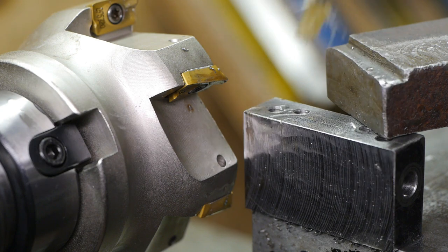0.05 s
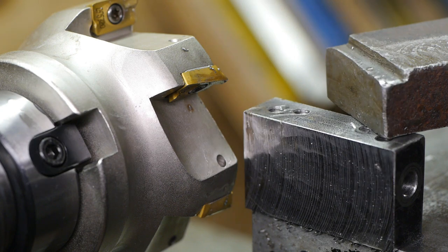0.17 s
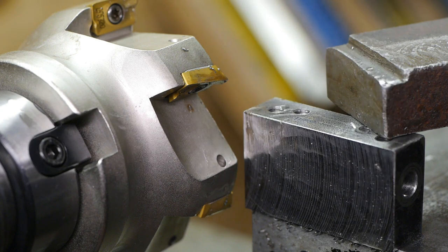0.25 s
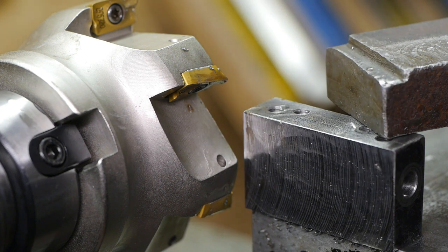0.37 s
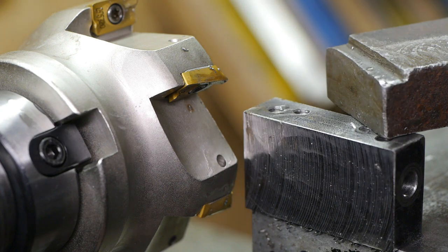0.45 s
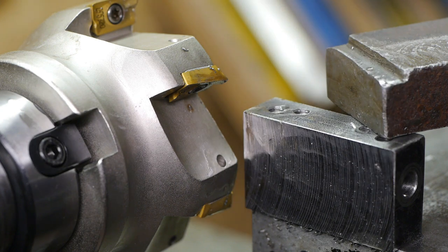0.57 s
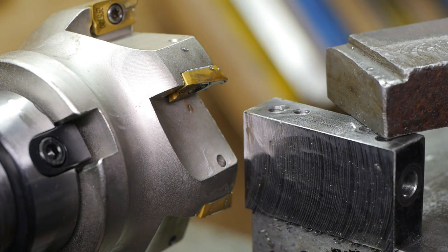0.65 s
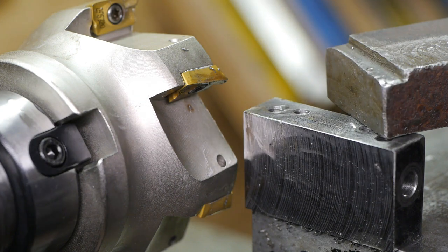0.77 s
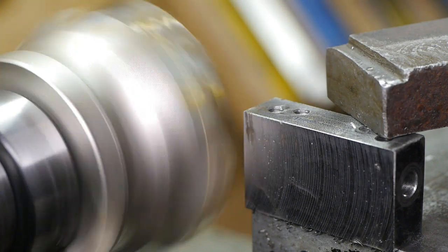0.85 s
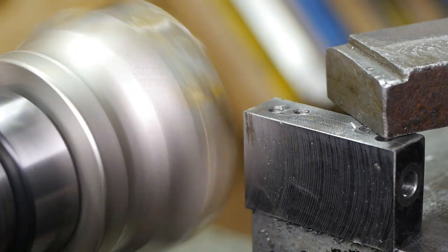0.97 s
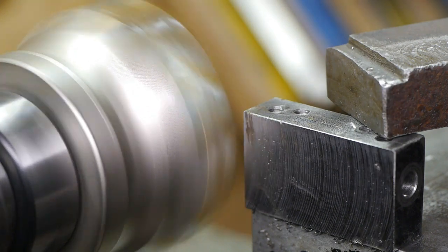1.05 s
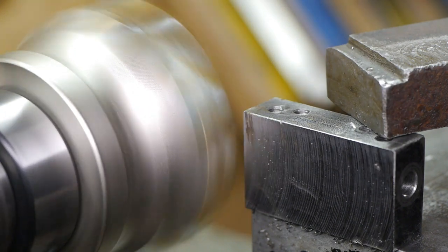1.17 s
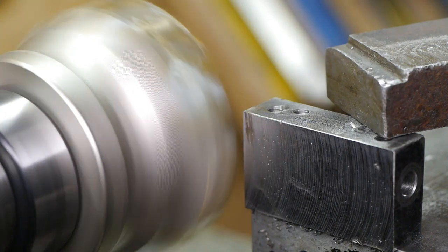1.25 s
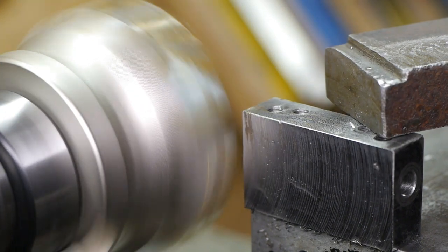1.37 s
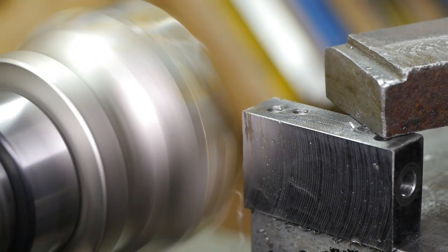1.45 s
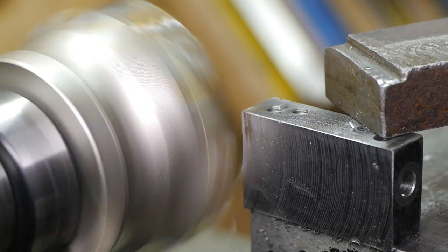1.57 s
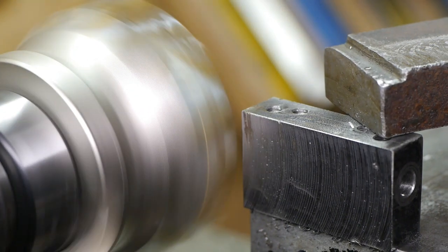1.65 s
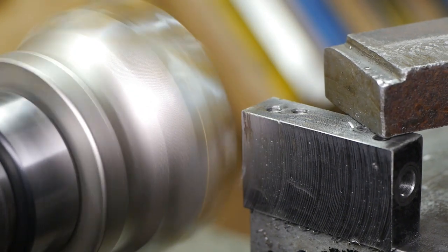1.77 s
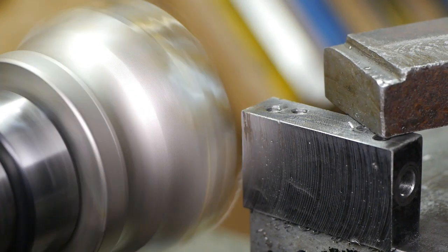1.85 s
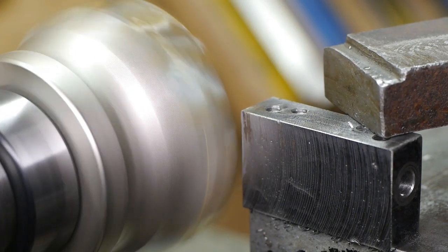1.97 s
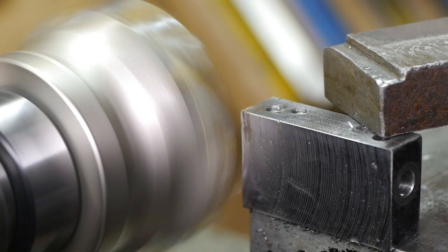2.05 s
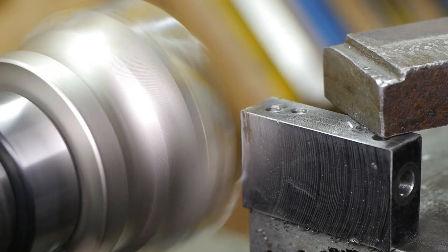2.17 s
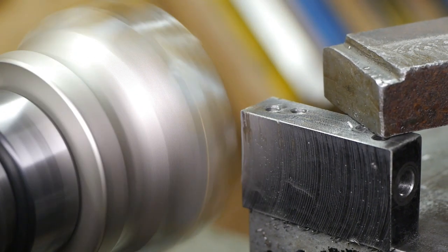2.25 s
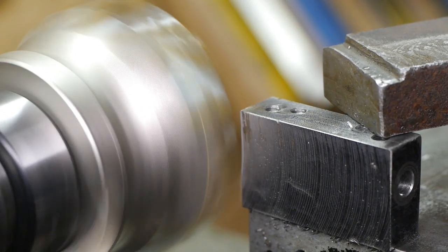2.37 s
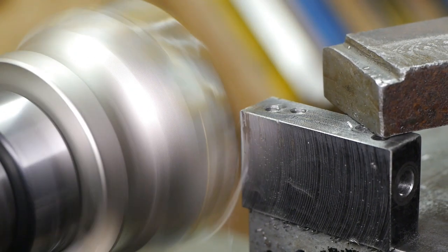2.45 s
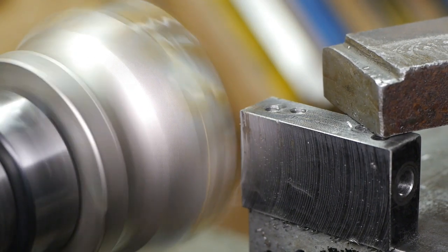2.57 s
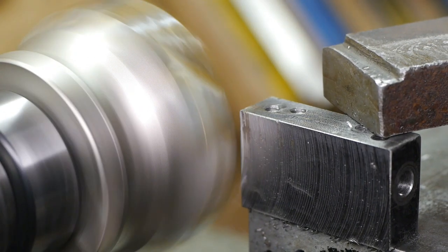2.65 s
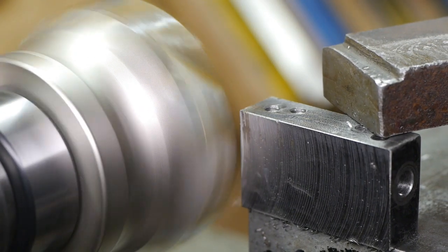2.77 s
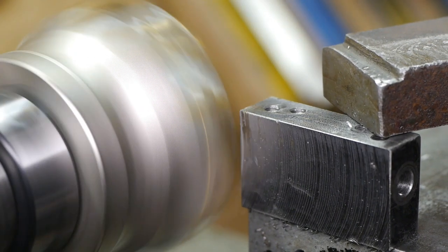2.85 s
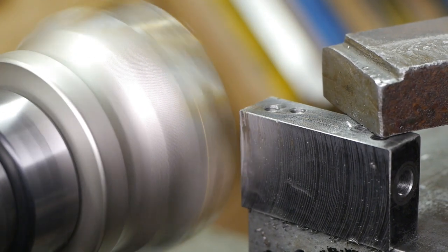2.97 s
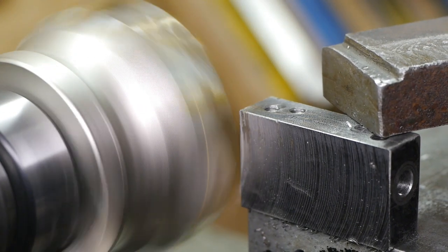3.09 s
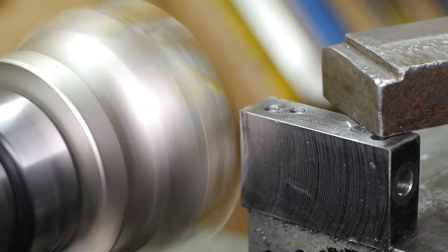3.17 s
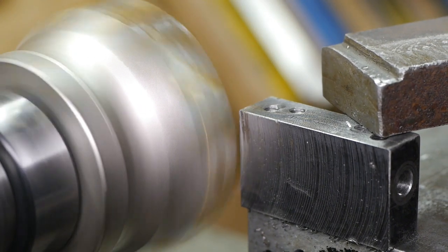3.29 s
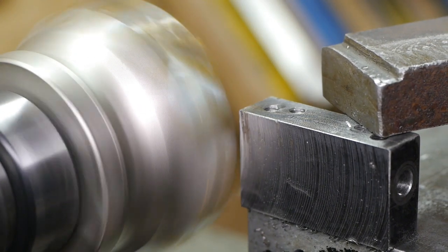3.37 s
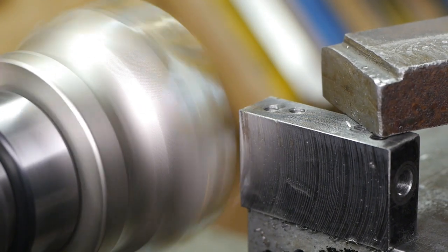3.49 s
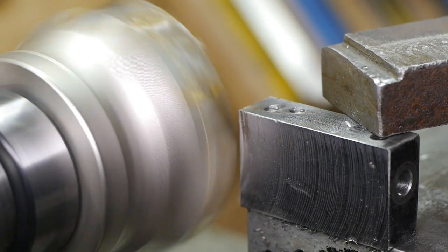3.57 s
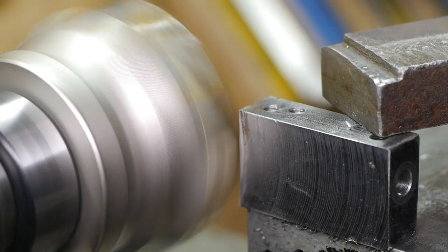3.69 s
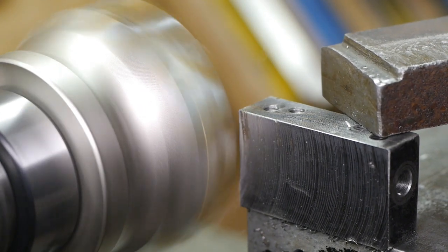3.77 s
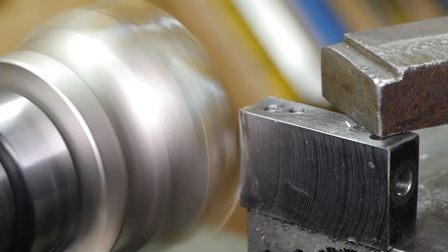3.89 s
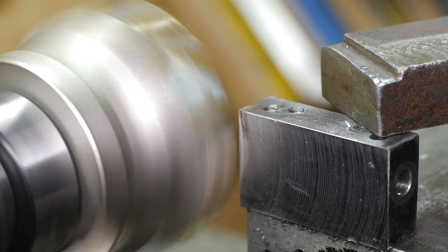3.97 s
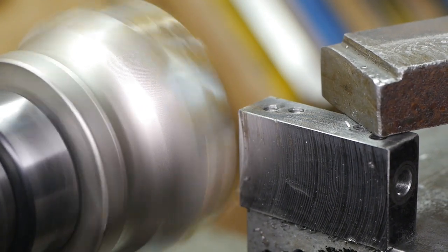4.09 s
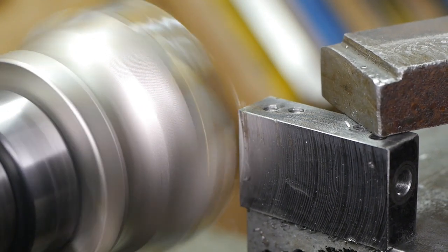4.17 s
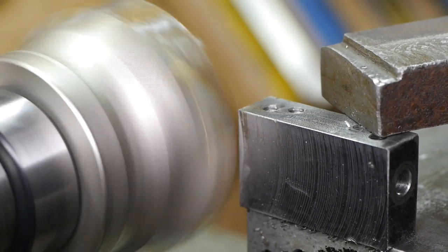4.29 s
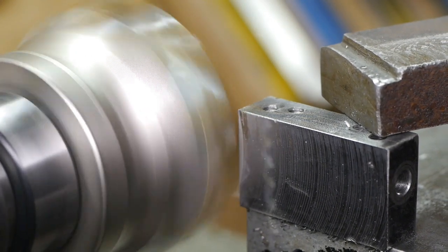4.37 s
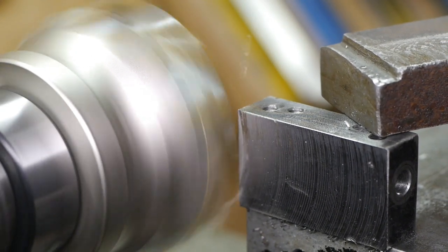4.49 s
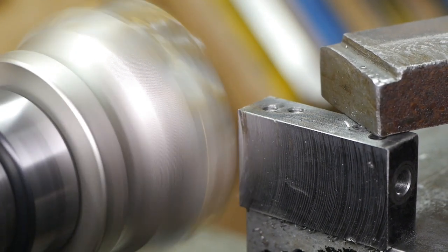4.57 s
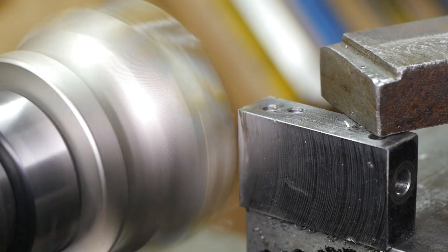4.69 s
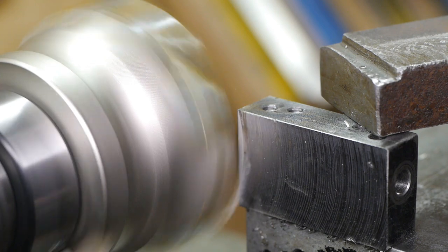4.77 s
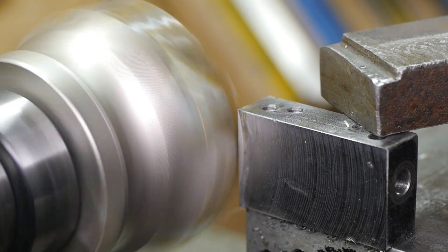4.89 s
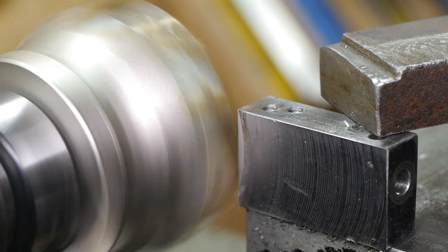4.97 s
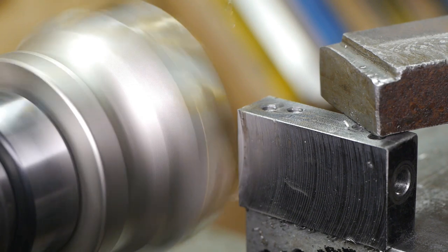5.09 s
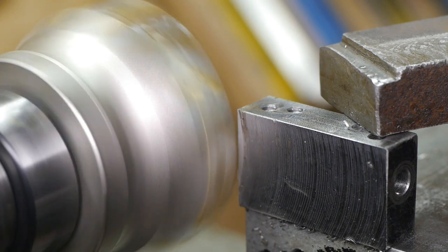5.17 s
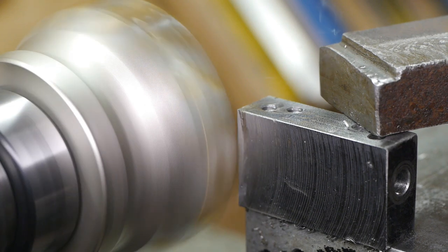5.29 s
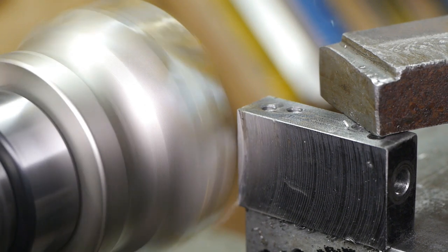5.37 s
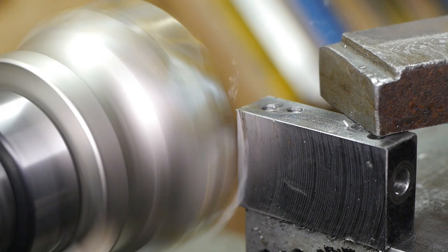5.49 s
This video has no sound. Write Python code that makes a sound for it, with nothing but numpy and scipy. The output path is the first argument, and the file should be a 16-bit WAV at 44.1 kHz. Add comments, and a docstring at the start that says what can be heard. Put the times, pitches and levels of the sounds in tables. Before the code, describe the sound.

Air hisses from a nozzle twice, then a spinning milling cutter swells into a ringing whine, thumping about seven times a second against steel.

```python
"""A workshop: a lathe spins a face-milling cutter. First it is quiet, with a hum, a passing rumble,
hiss noise and puffs of compressed air that ring the air gun. Then the machine fades in: the inverter-fed
motor whines in sums of steady sines over the headstock's roar, which is noise shaped by resonances.
The drive thumps in low tones that swell and fade once a spindle turn, with growling noise from the block,
and teeth squeak as they graze the steel: rough, sinking rings with a scrape and a dull body ring."""
import sys
import numpy as np
from scipy import signal
from scipy.fft import rfft, irfft, next_fast_len
from scipy.io import wavfile
from scipy.ndimage import uniform_filter1d, map_coordinates

SR = 44100
rng = np.random.default_rng(int(sys.argv[2]) if len(sys.argv) > 2 else 0)


def store_wav(level_fs):
    """Save 16-bit WAV to argv[1]."""
    pcm = np.round(np.clip(np.atleast_2d(level_fs), -1, 1) * 32767)
    wavfile.write(sys.argv[1], SR, pcm.T.astype(np.int16))


N = 243873
TIME_S = np.arange(N) / SR
HALVES = np.array([[.5], [-.5]])  # splits a left-right difference between the channels
TURN_HZ = 6.92  # spindle turns a second
START_S = .905  # the quiet shop ends and the scene changes to the running machine


def amp(db):
    """dB to gain."""
    return 10 ** (np.asarray(db) / 20)


def unit(x):
    """Scaled to rms 1."""
    return x / np.sqrt(np.mean(x ** 2) + 1e-20)


def along(points, hz):
    """Value at hz between (Hz, value) points, on a log frequency axis."""
    f, value = np.transpose(points)
    return np.interp(np.log(hz + 1), np.log(f + 1), value)


def gains(rows):
    """One gain per sample for each dB column; silence outside the rows."""
    s, *columns = np.transpose(rows)
    return [amp(np.interp(TIME_S, s, db, left=-200, right=-200)) for db in columns]


def wobble(rate):
    """A smooth random curve, rate knots a second."""
    knots = rng.standard_normal(int(N * rate / SR) + 4)
    return map_coordinates(knots, [np.arange(N) * rate / SR])


def filtered(x, response):
    """x times a response of frequency."""
    m = next_fast_len(x.shape[-1] + 8192)
    spectrum = rfft(x, m) * response(np.fft.rfftfreq(m, 1 / SR))
    return irfft(spectrum, m)[..., :x.shape[-1]]


def humps(modes, f):
    """Gain of (Hz, width Hz, dB) resonances standing on a flat floor."""
    return np.sqrt(1 + sum(amp(2 * db) / (1 + (2 * (f - c) / w) ** 2) for c, w, db in modes))


def lead_phase(points, hz):
    """Left and right phasors for a left lead given as (Hz, rad) points."""
    return np.exp(1j * HALVES * along(points, hz))


def rush(colour, alike, patchy_db, size=N):
    """Stereo noise of rms 1 over its first size samples, with patches of random gain."""
    z = signal.stft(rng.standard_normal((2, size)), nperseg=512)[2]
    patches = uniform_filter1d(rng.standard_normal(z.shape[1:]), size=6, axis=0)
    patches = uniform_filter1d(patches, size=8, axis=1)
    pair = signal.istft(z * amp(patchy_db * unit(patches)), nperseg=512)[1][:, :size]

    def mid_side(hz):
        # the likeness of left and right sets the balance of mid and side
        angle = np.arccos(np.clip(along(alike, hz), -1, 1)) / 2
        return colour(hz) * [np.cos(angle), np.sin(angle)]

    mid, side = filtered(pair, mid_side)
    return np.pad(unit(np.array([mid + side, mid - side])), ((0, 0), (0, N - size)))


# Passing rumble. Each row: time in seconds, level in dB.
PASSING_LEVEL = [(0, -68), (.17, -61), (.52, -55.5), (.7, -59.5), (.905, -65.5)]
# Colours of the rumble and the hiss. Each row: frequency in Hz, density in dB per Hz.
RUMBLE_COLOUR = [(15, -48), (25, -20), (96, -5), (124, -15), (257, -11.5), (300, -14.5), (515, -13),
                 (834, -14.5), (936, -16), (1090, -16), (2500, -40), (3250, -69), (5500, -120)]
HISS_COLOUR = [(880, -9), (1500, -2.5), (2800, -3), (3280, -2), (4100, -3.5), (6560, -4.5), (9060, -5.5),
               (15500, -13)]
# Resonances in the rumble. Each row: frequency in Hz, width in Hz, boost in dB.
RUMBLE_MODES = [(310, 44, 10.5), (453, 53, 6.5), (1100, 45, 6)]
HUM_DB, HISS_DB = -66, -63


def shop():
    """The idle workshop: a sine hum wavering in pitch and level, a passing noise rumble and hiss."""
    rumble_gain, = gains(PASSING_LEVEL)
    phase = 2 * np.pi * 96 * TIME_S + 0.88 * wobble(8.6)
    hum = unit(np.sin(phase) * amp(2.2 * wobble(8.6)))
    rumble = rush(lambda f: amp(along(RUMBLE_COLOUR, f)) * humps(RUMBLE_MODES, f),
                  [(60, 1.0), (1500, 0.14)], patchy_db=-1.5, size=SR)
    hiss = rush(lambda f: amp(along(HISS_COLOUR, f)),
                [(2000, 0.048), (12000, 0.22)], patchy_db=0.5, size=SR)
    quiet = TIME_S < START_S
    return (amp(HUM_DB) * hum + amp(HISS_DB) * hiss) * quiet + rumble_gain * rumble


# Two puffs of air, one list each. Each row: time in seconds, level in dB.
PUFF_LEVELS = [
    [(0.0, -80), (0.008, -65), (0.05, -47.5), (0.09, -78)],
    [(0.478, -68), (0.495, -62), (0.499, -56), (0.525, -56), (0.527, -43), (0.546, -40.5), (0.562, -47.5),
     (0.6, -61), (0.64, -68)],
]
# Nozzle colour of each puff, one list each. Each row: frequency in Hz, density in dB per Hz.
NOZZLE_COLOURS = [
    [(880, -58), (1500, -26), (1820, -13), (3690, -22), (3950, -13), (8460, 0), (12600, -2), (15500, -21)],
    [(350, -44), (600, -17), (1150, -12.5), (1690, -11), (2100, -3), (2680, -2), (2990, -7), (3240, -3),
     (7040, -3), (15500, -17)],
]
# Air gun resonances. Each row: frequency in Hz, width in Hz, boost in dB.
GUN_MODES = [(2146, 60, 5), (2760, 90, 10), (3280, 80, 7), (4120, 46, 8), (4930, 70, 9)]
# Knocks of the gun. Each row: time in seconds, level in dB, share of the full ring length.
GUN_KNOCKS = [(.499, -54, .5), (.528, -42, 1), (.535, -49, .6), (.545, -48, .8), (.551, -49, 1)]
# Rings in every knock. Each row: frequency in Hz, dB relative to the knock, full 60 dB decay in seconds.
GUN_RINGS = [(824, -4, 0.02), (2156, -11, 0.41), (2710, -12.5, 0.18), (3290, -14, .2), (4130, -11, .1)]
# Single short rings. Each row: time in seconds, starting level in dB, frequency in Hz, 60 dB decay in seconds.
SINGLE_RINGS = [(.551, -46, 141, .08), (.373, -47, 1120, .015), (.373, -49, 620, .02)]


def air_gun():
    """Puffs of turbulent air sputter as shaped noise; knocks set off decaying sine rings of the gun."""
    out, t = np.zeros((2, N)), np.arange(SR // 8) / SR
    for rows, colour in zip(PUFF_LEVELS, NOZZLE_COLOURS):
        air = rush(lambda f: amp(along(colour, f)) * humps(GUN_MODES, f),
                   [(2000, 0.53), (12000, 0.73)], patchy_db=3.0, size=SR)
        sputter = unit(amp(1.7 * wobble(700)))
        out += gains(rows)[0] * air * sputter
    rings = [(s, db + level, hz, t60 * share)
             for s, db, share in GUN_KNOCKS for hz, level, t60 in GUN_RINGS]
    for s, db, hz, t60 in [*rings, *SINGLE_RINGS]:
        out[:, round(s * SR):][:, :len(t)] += amp(db - 60 * t / t60) * np.sin(2 * np.pi * hz * t)
    return out


# Edges of the stairs that open the fade. Each entry: time in seconds.
STAIR_EDGES = [.905, .925, .965, 1.008, 1.045, 1.105, 1.18]
FADE_FROM_S, FADE_TO_S = 0.89, 2.37


def fade():
    """Silence until the scene changes, then a straight rise to full level that first climbs in stairs."""
    edges = np.array(STAIR_EDGES)
    centres = (edges[1:] + edges[:-1]) / 2
    held = centres[np.clip(np.searchsorted(edges, TIME_S) - 1, 0, len(edges) - 2)]
    stairs = uniform_filter1d(np.where(TIME_S < edges[-1], held, TIME_S), size=100)
    return np.clip((stairs - FADE_FROM_S) / (FADE_TO_S - FADE_FROM_S), 0, 1) * (TIME_S > START_S)


# Motor tones. Each row: multiples of the switching rate, of the step and of the beat,
# level in dB rms, left-right difference in dB, flutter in rad.
MOTOR_TONES = [(0, 4, 1, -47.3, 1.8, 0), (0, 5, -1 / 3, -47.2, 5.3, 0), (0, 5, 0, -25.7, 4.1, .12),
               (0, 6, 1, -53.5, -1.8, 0), (0, 7, -1, -53.5, .2, 0), (0, 7, 0, -47.9, 2.9, 0),
               (0, 12, 0, -45.8, 2.9, 0), (1, -5, -1, -52, 1.3, 0), (1, -5, 0, -36.5, -9.1, .95),
               (1, -5, 1, -50.5, 0, 0), (1, -3, 0, -54, 3.8, 0), (1, -2, -1, -46.2, .4, 0),
               (1, -2, 0, -51.8, 8.2, 0), (1, 0, 0, -39.7, 9.3, 0), (1, 2, 0, -41.6, 13.7, 0),
               (1, 5, 0, -46, 1.1, .3), (1, 7, 0, -51.8, 4, 0), (1, 7, 1, -52.7, 2.6, 0),
               (1, 12, 0, -50.9, -6, 0), (2, -7, 0, -57.1, 8.8, 0), (2, -5, 0, -51.5, -2.5, .35),
               (2, -3, 0, -50, 3.1, 0), (2, -2, 0, -50, -2, 0), (2, 0, 0, -40.7, .1, 0),
               (2, 0, 2, -60, 2.5, 0), (2, 2, -2, -58.9, 1.9, 0), (2, 2, 0, -36.8, 1.1, 0),
               (2, 2, 2, -57.3, -3.6, 0), (2, 2, 4, -47.8, 2.8, .3), (2, 3, 0, -58.9, 3, 0),
               (2, 8, 0, -54.5, 8.5, 0), (2, 25, 0, -59.3, 4.3, 0), (3, -12, 0, -54.5, 6.7, 0),
               (3, -10, 0, -56.8, -3.1, .3), (3, -7, 0, -51.9, 5.5, 0), (3, -5, 0, -52.1, 8.5, 0),
               (3, -3, 0, -51, 11.6, 0), (3, 2, 0, -53.6, -1.2, 0), (3, 25, 0, -59.8, -5.6, 0),
               (4, -7, 0, -60.2, .6, 0), (5, -8, 0, -56.5, 2, 0), (5, 0, -5, -54.7, 6.5, 0),
               (5, 0, 6, -60.5, -.5, 0), (0, 2, 0, -51, 0, 0)]
# Gear tones, and the motor's tone three steps up at 674 Hz. Each row: frequency in Hz, level in dB rms, left-
# right difference in dB, flutter in rad.
GEAR_TONES = [(427, -57, -.6, 0), (506, -54.5, 0, .3), (533, -58, 0, 0), (674, -57, 0, 0),
              (4860.2, -48.3, 5.7, .2)]
# Side lines of every tone. Entries: dB one beat under, one beat over and two beats over it.
SIDE_LINES_DB = [-30, -16, -30]
# Change in side line strength. Each row: frequency in Hz, gain in dB.
SIDE_LINE_GAIN = [(1200, 0), (1570, -4), (2000, -3), (2450, 1), (2700, -9), (3120, -6), (3500, 0),
                  (4000, -1), (4450, -6), (5300, 3)]
# Phase between the channels. Each row: frequency in Hz, left lead in rad.
TONE_LEAD = [(500, 0.14), (880, 0.92), (1200, 0.65), (1500, 0.43), (2000, 0.12), (2450, 0.92),
             (2900, 0.043), (3400, -0.084), (4450, -0.53), (8000, 0.42), (12000, 0.93)]
SWITCH_HZ, STEP_HZ = 2000, 224.75  # inverter switching rate, step of its side tones
BEAT_HZ, SHAFT_HZ = 82.5, 13.65  # twice the drive frequency, shaft turns a second
QUIVER_DB, QUIVER_RATE = -22, 50  # fast random unsteadiness, knots a second


def whine():
    """Motor and gear sines flutter with the shaft and beat with the drive, panned and lagged per tone."""
    out = np.zeros((2, N))
    shaft = np.cos(2 * np.pi * (SHAFT_HZ * TIME_S - .22))
    beat = np.exp(2j * np.pi * BEAT_HZ * TIME_S)
    under, over, twice = amp(SIDE_LINES_DB)
    sides = under / beat + over * beat + twice * beat ** 2
    drift = 0.078 * wobble(5.55)  # rad, shared by all tones
    motor = [(a * SWITCH_HZ + b * STEP_HZ + c * BEAT_HZ, *rest) for a, b, c, *rest in MOTOR_TONES]
    # three quivers, dealt out in turn
    quivers = [1 + amp(QUIVER_DB) * (wobble(QUIVER_RATE) + 1j * wobble(QUIVER_RATE)) for _ in range(3)]
    for k, (hz, db, pan_db, flutter) in enumerate([*motor, *GEAR_TONES]):
        phase = 2 * np.pi * (hz * TIME_S + rng.random()) + drift + flutter * shaft
        channels = unit(amp(HALVES * pan_db)) * lead_phase(TONE_LEAD, hz)
        swell = 1 + min(0.78 * flutter, .3) * shaft
        beating = 1 + amp(along(SIDE_LINE_GAIN, hz)) * sides
        tone = swell * beating * quivers[k % len(quivers)] * np.exp(1j * phase)
        out += amp(db) * np.imag(channels * tone)
    return out * np.sqrt(2)  # sine peak for the rms levels


# Colour of the roar. Each row: frequency in Hz, density in dB per Hz.
ROAR_COLOUR = [(40, -19), (100, -4), (400, -14.5), (1300, -7), (1750, -11.5), (2300, -8), (3000, -3.5),
               (3500, -5.5), (4300, -5.5), (5100, -7), (6000, -6.5), (8000, -7.5), (10000, -7.5),
               (12500, -13.5), (14000, -23.5), (15500, -31)]
# Headstock resonances. Each row: frequency in Hz, width in Hz, boost in dB.
CASING_MODES = [(455, 64, 14), (634, 23, 7), (880, 40, 16.5), (960, 32, 13.5), (1114, 16, 13.5),
                (1445, 60, 13.5), (1977, 66, 11), (4930, 110, 6), (8220, 68, 4), (9500, 300, -5)]
# Stereo width. Each row: frequency in Hz, likeness of left and right (1 is identical).
ROAR_LIKENESS = [(60, 0.84), (120, 0.88), (240, 0.91), (480, 0.97), (950, 0.77), (1890, 0.6), (3770, 0.18),
                 (7520, 0.66), (15000, 0.34)]
# Stereo balance. Each row: frequency in Hz, left-right difference in dB.
ROAR_PAN = [(60, -4), (130, 0.5), (290, -1), (640, -2), (1410, 4), (3100, 2), (6820, 1.5), (15000, 0)]
# Phase between the channels. Each row: frequency in Hz, left lead in rad.
ROAR_PHASE = [(0, -0.5), (1120, 0.63), (1810, 0.85), (2930, -0.1), (3790, 0.1), (4650, -1.5), (5340, 1),
              (9470, -0.7), (15200, 3.5)]
BANDING_DB, BANDING_HZ = 1.7, 70  # random ripple in the roar's colour: depth in dB, spacing in Hz


def roar():
    """Gears, bearings and fan: noise in the casing's resonances, swelling twice a turn."""
    ripple = rng.standard_normal(SR // BANDING_HZ)

    def colour(f):
        banding = BANDING_DB * map_coordinates(ripple, [f / BANDING_HZ])
        return amp(along(ROAR_COLOUR, f) + banding) * humps(CASING_MODES, f)

    noise = rush(colour, ROAR_LIKENESS, patchy_db=.9)
    noise = filtered(noise, lambda f: amp(HALVES * along(ROAR_PAN, f)) * lead_phase(ROAR_PHASE, f))
    swell_db = 0.96 * np.cos(2 * np.pi * (2 * TURN_HZ * TIME_S - .8))
    return noise * amp(swell_db + 0.9 * wobble(9))


# Thin steady whines. Each row: frequency in Hz, level in dB rms.
TREBLE_WHINES = [(4503, -61), (5219, -64), (5574, -63), (5655, -63), (6201, -60), (6920, -61), (7124, -62),
                 (7326, -60), (7573, -61), (7821, -64), (7903, -63), (8494, -62), (8629, -63), (8944, -57),
                 (9423, -64), (9453, -60), (9504, -64), (9536, -63), (10045, -64), (10411, -64),
                 (10578, -61), (11423, -64), (11536, -63)]
FAINT_DB, FAINT_SCATTER_DB = -65.5, 3  # base level, added to the roar's colour, and its random spread


def faint_tones():
    """Weak sines of chance strength at sums of switching rate, steps and beats, and thin treble whines."""
    a, b, c = np.mgrid[0:7, -12:13, -1:2].reshape(3, -1)
    hz = a * SWITCH_HZ + b * STEP_HZ + c * BEAT_HZ
    hz = hz[hz > STEP_HZ * 4]
    size, pan, turn = rng.standard_normal((len(hz), 3)).T
    channels = amp(1.1 * pan * [[1], [-1]]) * lead_phase(TONE_LEAD, hz)
    level = amp(FAINT_DB + along(ROAR_COLOUR, hz) + FAINT_SCATTER_DB * size)
    lines = np.zeros((2, N // 2 + 1), complex)  # each line is one bin of the whole spectrum
    lines[:, np.round(hz * N / SR).astype(int)] = level * channels * np.exp(10j * turn)
    for line_hz, db in TREBLE_WHINES:
        start = np.exp(2j * np.pi * rng.random())
        lines[:, round(line_hz * N / SR)] = amp(db) * start * lead_phase(TONE_LEAD, line_hz)[:, 0]
    return irfft(lines, N) * N / np.sqrt(2)


def thumps(swells):
    """Tones swell and fade at the same angles of every turn, a little different each time."""
    out = np.zeros(N)
    for hz, share, half, db in swells:
        turns = TIME_S * TURN_HZ - share + .5
        since = (turns % 1 - .5) / TURN_HZ  # seconds from the swell's centre
        size, slip = rng.standard_normal((int(turns[-1]) + 2, 2))[turns.astype(int)].T
        bump = np.exp(-.5 * (since / half) ** 2)
        out += amp(db + 0.5 * size) * bump * np.sin(2 * np.pi * hz * since + 0.5 * slip)
    return out


# Working levels at full fade. Each row: time in seconds, load on the drive in dB, cutting growl in dB.
LOAD_LEVELS = [(1.2, -27, -49), (1.6, -5.5, -58), (2.3, -1, -42.5), (3, -1.5, -46), (4.2, 0, -37.5),
               (5.53, -3.5, -38)]
# Lathe bed under load, then block and clamp. Each row: frequency in Hz, density in dB per Hz.
BED_COLOUR = [(50, -120), (90, -41), (130, -14.5), (185, 0.5), (240, -1.5), (290, -3), (350, -7),
              (420, -26), (700, -120)]
GROWL_COLOUR = [(200, -120), (340, -10.5), (430, -1.5), (500, 1), (560, 5.5), (620, -11), (685, 3.5),
                (760, -11), (900, -34), (1500, -120)]
# Drive thumps. Each row: frequency in Hz, share of a turn, half length in seconds, dB at load 0.
DRIVE_THUMPS = [(292, 0.0796, 0.013, -36.5), (184, 0.074, 0.0056, -37), (185, 0.2322, 0.0087, -32),
                (190, 0.54, 0.0079, -40), (498, .14, 0.019, -37.5), (379.5, 0.059, 0.008, -40.5),
                (107.7, 0.198, 0.12, -51.5)]
# Block swells. Each row: frequency in Hz, share of a turn, half length in seconds, dB over the growl.
BLOCK_BITES = [(703, 0.58, 0.0053, 0), (388, .45, 0.0069, -6), (545, 0.574, 0.021, -4)]
BED_DB = -45  # at load 0


def chug():
    """The load peaks once a turn: it shakes the bed, and two tooth passes growl in the block."""
    load, growl = gains(LOAD_LEVELS)
    angle = 2 * np.pi * TURN_HZ * TIME_S
    bed = rush(lambda f: amp(along(BED_COLOUR, f)), [(200, 0.92)], patchy_db=0.0)
    block = rush(lambda f: amp(along(GROWL_COLOUR, f)), [(500, 0.97)], patchy_db=-0.5)
    bed = bed * amp(4.5 * np.cos(angle - 1.1))
    block = block * amp(4.7 * np.cos(angle - 1.6) + 0.63 * np.cos(2 * angle - 2.2))
    drive = amp(BED_DB) * unit(bed) + thumps(DRIVE_THUMPS)
    return load * drive + growl * (0.88 * unit(block) + thumps(BLOCK_BITES))


# Proudest tooth, once a turn. Each row: time in seconds, squeak in dB before trim, tool body in dB.
PROUD_TOOTH = [(2.370, -31, -48), (2.515, -29, -50), (2.660, -22, -43), (2.803, -23.5, -42),
               (2.949, -25.5, -42), (3.093, -24.5, -44), (3.239, -23, -37), (3.383, -24.5, -45),
               (3.528, -26, -42), (3.673, -26, -41), (3.817, -28, -33), (3.961, -27, -33),
               (4.106, -27, -31), (4.249, -27, -40), (4.392, -28, -38), (4.540, -28, -36),
               (4.684, -30, -31), (4.829, -28.5, -32), (4.97, -26, -32), (5.116, -27, -43),
               (5.264, -28, -47), (5.410, -29, -33)]
# Lower teeth. Each row: share of a turn later, squeak in dB before trim, tool body in dB.
LOWER_TEETH = [(.5, -35, -44), (.65, -37, -38)]
# Random spread of the lower teeth. Entries: time in seconds, squeak in dB, tool body in dB.
LOWER_SPREAD = [.003, 2.5, 3]


def grazes():
    """Every tooth pass: (s, squeak dB, tool body dB), the lower teeth scattered from turn to turn."""
    starts = np.transpose(PROUD_TOOTH)[0]
    lower = np.array([(s + share / TURN_HZ, db, body_db)
                      for s in starts for share, db, body_db in LOWER_TEETH])
    return np.r_[PROUD_TOOTH, lower + rng.standard_normal(lower.shape) * LOWER_SPREAD]


SQUEAK_HZ, SINK_HZ_PER_S, SQUEAK_TRIM_DB = 6167, 45, -2.0
# the squeak smears and a broad scrape grows as the cut goes on
ROUGHENS_PER_S, SCRAPE_DB, SCRAPE_DB_PER_S = .12, -10.5, 2.5
LOW_BODY_HZ, HIGH_BODY_HZ, BODY_TURNS_S = 1704, 1893, 4.3  # the upper mode leads after this time


def squeaks():
    """A tooth scrapes the block: a rough, sinking insert ring, a broad scrape and a dull tool body ring."""
    out, t = np.zeros(N + SR), np.arange(SR // 16) / SR
    for s, db, body_db in grazes():
        since = s - PROUD_TOOTH[0][0]
        hz = SQUEAK_HZ - SINK_HZ_PER_S * since + rng.normal(0, 50)
        slips = rng.standard_normal((2, len(t)))
        for size in (36, 30, 24):
            slips = uniform_filter1d(slips, size=size, axis=1)
        # uneven slips smear the ring into a band
        rough = 1 + (0.49 + ROUGHENS_PER_S * since) * (unit(slips[0]) + 1j * unit(slips[1]))
        ring = np.real(rough * np.exp(2j * np.pi * hz * (t - 0.4 * t * t)))
        scrape = filtered(rng.standard_normal(len(t)), lambda f: 1 / (1 + ((f - 4200) / 2400) ** 4))
        decay = np.exp(-t / (.006 + .0012 * since)) + .15 * np.exp(-t / .025)
        shape = (1 - np.exp(-t / 0.0015)) ** 2 * decay
        squeak = shape * (unit(ring) + amp(SCRAPE_DB + SCRAPE_DB_PER_S * since) * unit(scrape))
        upper = .3 + .6 / (1 + np.exp((BODY_TURNS_S - s) / .1))
        modes = (1.2 - upper) * np.sin(2 * np.pi * LOW_BODY_HZ * t)
        modes += upper * np.sin(2 * np.pi * HIGH_BODY_HZ * t)
        body = amp(-60 * t / 0.11) * (1 - np.exp(-t / 0.0027)) * modes
        begin = round(s * SR) - 160  # a little early, for the soft attack
        out[begin:][:len(t)] += amp(db + SQUEAK_TRIM_DB) * squeak + amp(body_db) * body
    return out[:N]


ROAR_DB, ROAR_LAG = -34, 1.14  # the roar rises a little later: power of the fade


def scene():
    """The machine fades in after the quiet shop; the teeth and the air gun keep their own levels."""
    rise = fade()
    machine = rise * (whine() + faint_tones() + chug())
    machine += amp(ROAR_DB) * rise ** ROAR_LAG * roar()
    return shop() + air_gun() + machine + squeaks()


# Dips of the microphone housing. Each row: frequency in Hz, half width in Hz, depth 0-1 (held to 0.9).
HOUSING_DIPS = [(2290, 65, 0.5), (5130, 70, 0.4), (3010, 45, 0.75), (9080, 123, 0.9), (11000, 130, 0.57)]
TOP_HZ = 15570  # band limit


def record(dry):
    """The microphone housing cuts narrow dips, and nothing is kept above the band limit."""
    def response(hz):
        dips = [1 - min(depth, .9) / (1 + ((hz - c) / w) ** 2) for c, w, depth in HOUSING_DIPS]
        return np.prod(dips, axis=0) * (hz < TOP_HZ)

    return filtered(dry, response)


dry = scene()
out = record(dry)
store_wav(out)
```